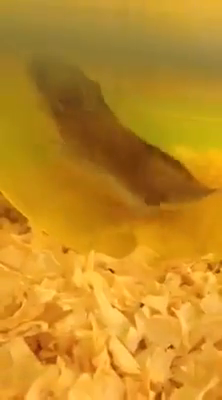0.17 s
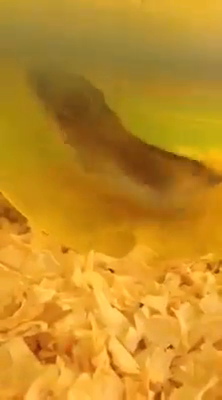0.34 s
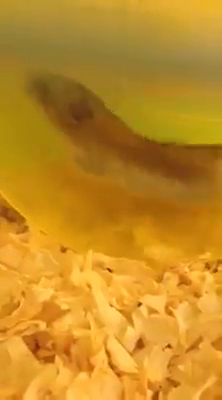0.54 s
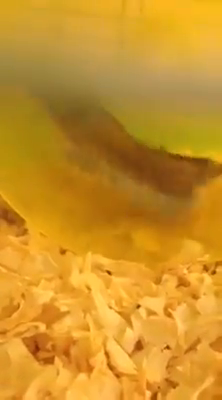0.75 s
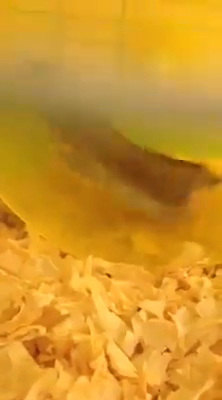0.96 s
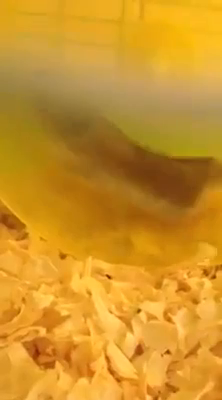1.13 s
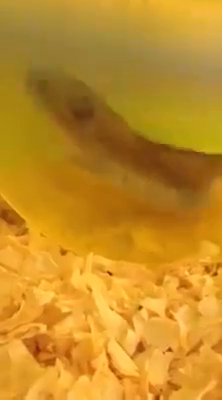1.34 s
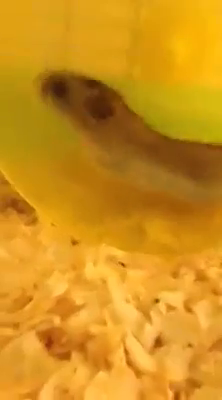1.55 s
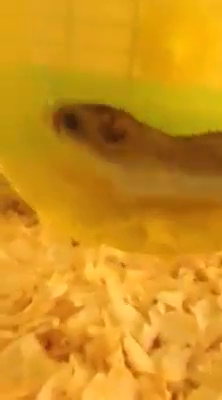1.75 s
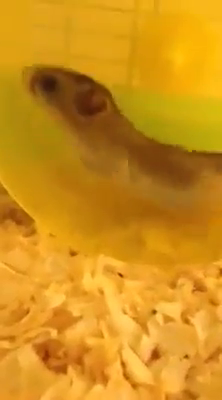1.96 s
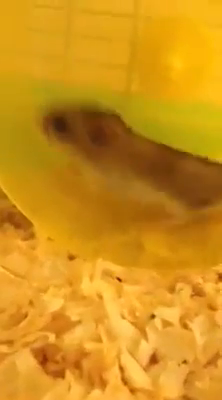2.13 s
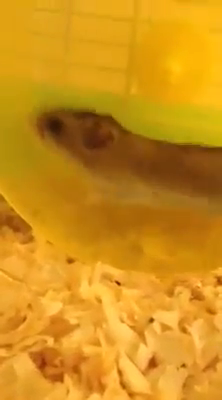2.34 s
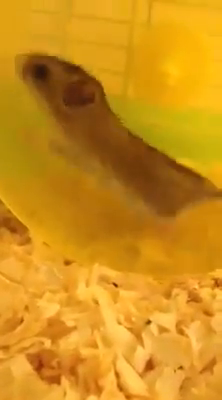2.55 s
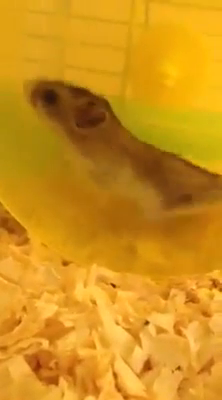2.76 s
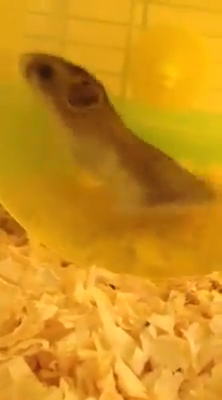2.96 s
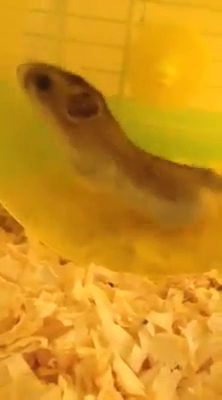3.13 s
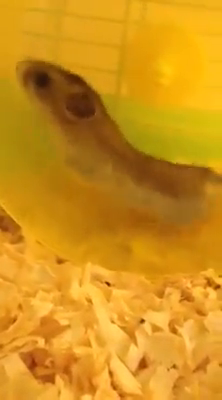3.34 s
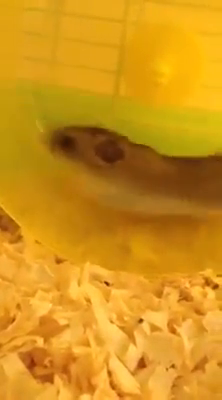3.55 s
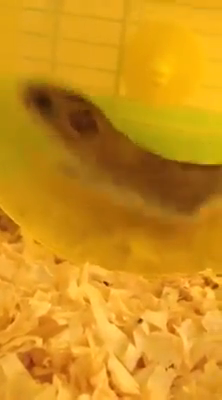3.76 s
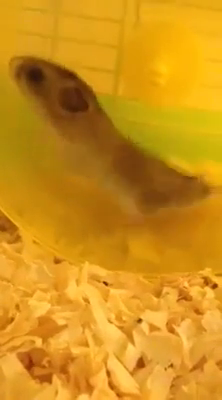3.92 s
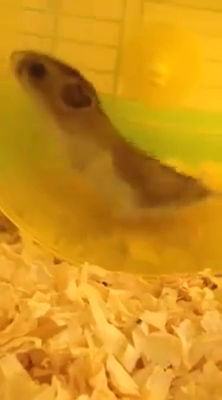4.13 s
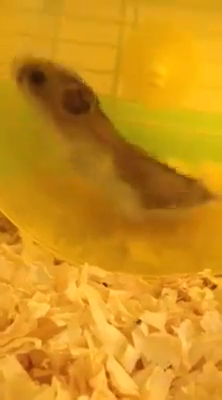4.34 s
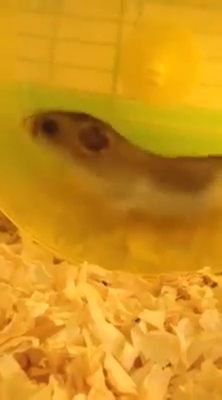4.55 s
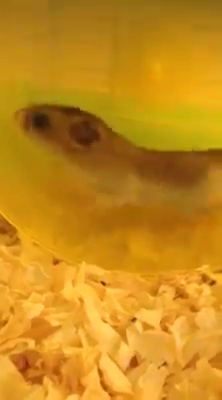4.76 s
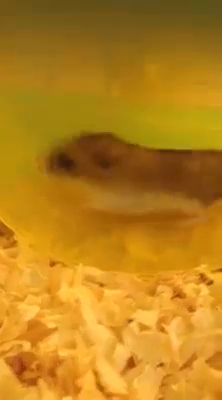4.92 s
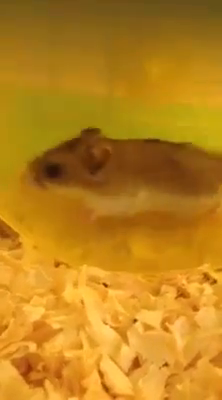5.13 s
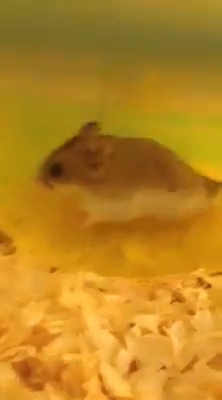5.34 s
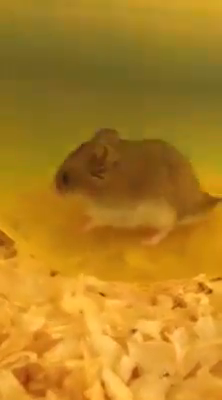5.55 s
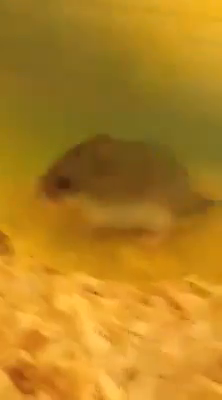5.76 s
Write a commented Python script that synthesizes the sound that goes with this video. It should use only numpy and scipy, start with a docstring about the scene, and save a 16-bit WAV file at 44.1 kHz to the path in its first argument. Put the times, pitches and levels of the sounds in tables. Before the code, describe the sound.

Rapid dull paw taps drum in bursts on a thin plastic wheel over faint grainy hiss, broken by sharp plastic clicks.

```python
"""Quick footfalls of a hamster running in bursts in a plastic wheel in a cage, close to the microphone.
Each paw rings the wheel's shell, taps it with claws and booms faintly in the cage's resonances.
Plastic parts snap a few times: a hard crack, a chatter and a jolt that knocks the wheel.
The turning wheel adds a grainy hiss, a low rumble and brief sizzles of shaped noise.
As the running stops, swelling strokes of friction noise brush and rustle nearby, over quiet room air."""
import sys
import numpy as np
from scipy import signal
from scipy.io import wavfile
from scipy.ndimage import uniform_filter1d

SR = 44100
rng = np.random.default_rng(int(sys.argv[2]) if len(sys.argv) > 2 else 0)


def to_wav(s):
    """Save 16-bit WAV."""
    ch = np.atleast_2d(s).T  # columns
    pcm = np.round(np.clip(ch, -1, 1) * 32767)  # PCM
    wavfile.write(sys.argv[1], SR, pcm.astype(np.int16))


N = 259749
TIME = np.arange(N) / SR  # seconds

# Footfalls, levels relative within each column:
# start_s, force_db (on the wheel), claw_db (tap), thump_db (passed to the cage)
FOOTFALLS = [(0.059, -49.5, -70, -67.5), (0.105, -43, -63, -67), (0.186, -42.5, -66.5, -67.5),
             (0.25, -44.5, -63, -77), (0.372, -51.5, -65, -68.5), (0.559, -40, -71, -70),
             (0.681, -36.5, -56, -62), (0.795, -37.5, -65.5, -57.5), (0.886, -41, -54, -52.5),
             (0.955, -47, -53.5, -54.5), (1.039, -39, -63, -57.5), (1.105, -35, -55, -60.5),
             (1.171, -31, -48.5, -53), (1.271, -35, -48.5, -53), (1.3, -33.5, -54.5, -66),
             (1.413, -54, -60.5, -60.5), (1.469, -32.5, -57.5, -62), (1.596, -42, -53.5, -51.5),
             (1.672, -35, -65, -57), (1.867, -37.5, -52.5, -55), (1.93, -39, -79, -59),
             (2.015, -39, -54.5, -56.5), (2.13, -41.5, -66, -65), (2.225, -39, -69, -68),
             (2.455, -44, -79, -59.5), (2.615, -52, -77, -65.5), (2.708, -48, -68, -66.5),
             (2.965, -52, -69, -64), (3.007, -40, -67, -63.5), (3.116, -39.5, -77, -65.5),
             (3.247, -39, -67, -59), (3.456, -41, -65, -66), (3.56, -37.5, -57.5, -61),
             (3.634, -46, -81, -69.5), (3.753, -35.5, -57.5, -57), (3.798, -38, -58.5, -54),
             (3.876, -38, -65, -56.5), (3.954, -40, -59, -60.5), (3.992, -36.5, -59, -60),
             (4.061, -33.5, -56, -58), (4.163, -46, -57.5, -53.5), (4.218, -52, -65.5, -62),
             (4.306, -35, -54, -55.5), (4.395, -34.5, -53, -58), (4.487, -35, -59, -63.5),
             (4.614, -44.5, -75, -60), (4.671, -36.5, -61, -67), (4.741, -40.5, -64, -69),
             (4.862, -43, -57, -57.5), (4.894, -48, -54.5, -54), (4.959, -39, -68, -60),
             (5.035, -38, -57, -67), (5.129, -45.5, -76, -69.5)]
# Snaps of plastic, levels relative within each column: start_s, crack_db, flex_db (of the wall),
# jolt_db (given to wheel and cage), top_hz (treble limit set by the contact's hardness)
PLASTIC_SNAPS = [(1.547, -8.5, -10.5, -32, 15000), (1.5570, -38, -28, -44, 5000),
                 (1.5728, -21.5, -36, -48, 8850), (1.7670, -46, -40, -45.5, 2000),
                 (1.7740, -20, -44, -47.5, 14100), (1.7827, -38, -28, -43.5, 12000),
                 (1.799, -28.5, -48, -47, 13100), (2.525, -44, -59, -72, 12000),
                 (5.638, -43, -43, -63, 4000), (5.8359, -12, -18.5, -52, 11000)]


def amp(db):
    """Decibels to gain."""
    return 10 ** (np.asarray(db) / 20)


def evened(x):
    """Scales to unit power."""
    return x / np.sqrt(np.mean(x ** 2) + 1e-20)


def add(mix, start_s, sound):
    """Adds a sound to the mix, in place, from start_s seconds."""
    part = mix[max(round(start_s * SR), 0):][:len(sound)]
    part += sound[:len(part)]


def response(points, size=4096):
    """Causal minimum-phase impulse response with the spectrum drawn through (Hz, dB) points."""
    hz, db = np.transpose(points)
    f = abs(np.fft.fftfreq(size, 1 / SR))
    log_gain = np.log(amp(np.interp(np.log(f + 1), np.log(hz), db)))
    spectrum = np.exp(np.conj(signal.hilbert(log_gain)))
    return np.fft.ifft(spectrum).real[:size // 2]


def colour(x, points):
    """Filters by a spectrum, to unit power."""
    return evened(signal.fftconvolve(x, response(points))[:len(x)])


def grains(count, spread_db):
    """Friction noise made of tiny contacts of uneven strength."""
    strength = evened(uniform_filter1d(rng.standard_normal(count), size=40))
    return rng.standard_normal(count) * amp(spread_db * strength)


def peak(x, hz, width_hz):
    """A fixed resonance of gain 1."""
    return signal.lfilter(*signal.iirpeak(hz, hz / width_hz, fs=SR), x)


def resonate(x, hz, width_hz):
    """A moving resonance of gain 1: shifts its centre to zero, smooths, and shifts back."""
    turn = np.exp(2j * np.pi * np.cumsum(hz * np.ones(len(x))) / SR)
    r = np.exp(-np.pi * width_hz / SR)
    smoothed = signal.lfilter([1 - r], [1, -r], x / turn)
    return 2 * (turn * smoothed).real


def swells(rows):
    """Gain of bell-shaped swells, each at half height at the ends of its length."""
    return sum(amp(db) * .5 ** ((2 * (TIME - s) / length) ** 2) for s, length, db in rows)


def footfalls(knock_db=-5.5, claws_db=-1.5, boom_db=3, boom_t60=0.29, boom_rise=0.0054, claw_lag_s=0.001196):
    """Each paw knocks the shell and taps it with its claws; the cage's boom swells a moment later."""
    out, t = np.zeros(N), np.arange(SR // 5) / SR
    for start_s, force_db, claw_db, thump_db in FOOTFALLS:
        shake = rng.standard_normal(len(t)) * amp(-60 * t / boom_t60) * np.tanh(t / boom_rise)
        boom = cage(shake)
        boom /= np.std(boom[:SR // 20])
        add(out, start_s, amp(force_db + knock_db) * knock(t))
        add(out, start_s, amp(thump_db + boom_db) * boom)
        # the claws touch just after the pad
        add(out, start_s + claw_lag_s, amp(claw_db + claws_db) * claws(t))
    # the small wheel radiates no deep bass
    return signal.sosfilt(signal.butter(4, 80, "high", fs=SR, output="sos"), out)


def knock(t, detune=0.019, uneven_db=1.4):
    """The shell rings; every paw lands on another spot, which shifts and weights the modes anew."""
    # Modes of the wheel's shell; low bending waves arrive later and swell slowly:
    # pitch_hz (before detuning), level_db (relative), t60_s, lag_s, rise_cycles
    shell_modes = [(126.8, -20, 0.28, 0, 2), (185, -10, 0.18, 0.017, 2.1), (267, -10, 0.12, 0.0048, 0.23),
                   (333.7, 2, 0.091, .005, 2.43), (416, -4.5, 0.024, 0.00032, 0.54),
                   (487.2, -1.5, 0.094, 0.00014, 1.08), (624, -11.5, 0.024, 0.00028, 0.42),
                   (646, -36, 0.018, 0.035, 0.23)]
    hz, db, t60, lag, rise = np.transpose(shell_modes)[:, :, None]
    pitch, weight = rng.standard_normal((2, len(shell_modes), 1))
    age = np.maximum(t - lag, 0)
    cycles = hz * (1 + detune * pitch) * age
    envelope = np.tanh(cycles / rise) * amp(db + uneven_db * weight - 60 * age / t60)
    return np.sum(envelope * np.sin(2 * np.pi * cycles), 0)


def claws(t, scrape_db=-26, scrape_t60=.06, uneven_db=2, tap_db=14):
    """A crisp tap; an impulse and a short scrape ring the plastic's higher resonances."""
    # Higher resonances of the plastic: centre_hz, width_hz, level_db (relative)
    claw_modes = [(567, 123, 12.5), (707, 21, 7), (892, 17, -1), (1043, 32, 12.5), (1075, 80, 4),
                  (1410, 22, 0.5), (1587, 13, 3), (1670, 120, 3), (1883, 60, 5), (2040, 37, -12),
                  (2430, 490, -38)]
    # Colour of a paw's first contact: pitch_hz, level_db (relative)
    tap_colour = [(100, -15.5), (300, 10), (600, -14.5), (1100, -8.5), (2100, -4.5), (2600, -12),
                  (5000, -40), (15000, -26)]
    paw_top_hz = 2240  # a paw is too soft to excite the plastic above this
    drive = grains(len(t), spread_db=9.5) * amp(scrape_db - 60 * t / scrape_t60)
    drive[0] += 1
    signs = (-1) ** np.arange(len(claw_modes))
    weights = amp(uneven_db * rng.standard_normal(len(claw_modes))) * signs
    ring = sum(w * amp(db) * peak(drive, hz, width) for w, (hz, width, db) in zip(weights, claw_modes))
    ring /= np.std(ring[:SR // 50])
    tap = response(tap_colour)
    add(ring, 0, amp(tap_db) * tap / abs(tap).max())
    return signal.sosfilt(signal.butter(6, paw_top_hz, fs=SR, output="sos"), ring)


def cage(x, low_hz=85, top_hz=720):
    """The cage's box resonances, which pass only the low middle range."""
    # Resonances of the cage: centre_hz, width_hz, level_db (relative)
    box_modes = [(114, 7.7, -15), (121.7, 9.2, 2), (189.7, 40, 4), (228.6, 8.2, 0.5), (271.7, 29, 3.5),
                 (318.6, 38, 3), (404, 42, 1), (469, 29, 0.5), (583, 32, -11.5), (612, 11, -8)]
    ring = sum(amp(db) * peak(x, hz, width) for hz, width, db in box_modes)
    return signal.sosfilt(signal.butter(3, [low_hz, top_hz], "band", fs=SR, output="sos"), ring)


def snaps(crack_db=-1, burst_db=-18, burst_t60=0.011, flex_hz=1400, chatter_db=-31, chatter_t60=0.043,
          jolt_t60=0.18, dull_db=-4):
    """A hard, gritty crack as the wall flexes, a brief chatter, and a dull jolt that rocks the wheel."""
    # Colour of a snap: pitch_hz, level_db (relative)
    snap_colour = [(60, -79), (250, 9), (600, -6.5), (1500, 5), (2700, 4.5), (3400, -2.5), (4400, -12),
                   (6300, -6.5), (8200, -15), (10000, -8), (15000, -16)]
    # Colour of the dull jolt that comes with it: pitch_hz, level_db (relative)
    jolt_colour = [(25, -13), (70, -25), (130, -2), (300, -5), (520, 1), (800, -10.5), (1300, -13.5),
                   (2200, -33), (5000, -32), (15000, -58)]
    # the wall's flex dies within a cycle and radiates little bass
    flex_radians, flex_low_hz = 2.1, 117
    # the jolted wheel rocks and knocks back on its axle
    rock_s, rock_db = .016, 2.5
    out, t = np.zeros(N), np.arange(SR // 7) / SR
    pulse = response(snap_colour)
    phase = 2 * np.pi * flex_hz * t
    flex = np.sin(phase) * np.exp(-phase / flex_radians)
    flex = signal.lfilter(*signal.butter(2, flex_low_hz, "high", fs=SR), flex)
    dying = amp(burst_db - 60 * t / burst_t60) + amp(chatter_db - 60 * t / chatter_t60)
    for start_s, db, flex_db, jolt_db, top_hz in PLASTIC_SNAPS:
        crack = dying * colour(rng.standard_normal(len(t)), snap_colour)
        add(crack, 0, amp(crack_db) * pulse / abs(pulse).max())
        add(out, start_s, amp(db) * signal.lfilter(*signal.butter(2, top_hz, fs=SR), crack))
        add(out, start_s, amp(flex_db) * flex)
        jolt = colour(rng.standard_normal(len(t)), jolt_colour)
        add(out, start_s, jolt * amp(jolt_db + dull_db - 60 * t / jolt_t60))
        add(out, start_s + rock_s, amp(jolt_db + rock_db) * knock(t))
    return out


def rolling(slow_db=-69.0, spin_db=2.0, grain_db=2.0, wobble_db=1.23):
    """The wheel slides round its axle: a grainy, wobbling hiss and a low rumble in the cage."""
    # Spells of faster turning, in which the hiss swells: middle_s, length_s, level_db (before spin_db)
    spins = [(.55, .85, -69), (1.48, 1, -67.5), (3.25, 0.73, -67), (4.5, 0.88, -66.5)]
    # Colour of the hiss: pitch_hz, level_db (relative)
    hiss_colour = [(410, -31), (700, -10), (871, -1), (1030, 3), (1180, -2), (1310, -1), (1490, -2.5),
                   (1880, -1.5), (2280, -6.5), (4160, -6), (5450, -11), (6110, -7.5), (8530, -11.5),
                   (14300, -10), (15000, -14)]
    # from here on, as the running ends, the wheel coasts and its hiss fades
    coast_s, coast_db_per_s = 4.67, 3
    rumble_db, rumble_idle_db = -26.5, -67.5
    wobble = wobble_db * evened(uniform_filter1d(rng.standard_normal(N), size=1500))
    coasting = amp(-coast_db_per_s * np.maximum(TIME - coast_s, 0))
    sliding = coasting * np.hypot(amp(slow_db), amp(spin_db) * swells(spins))
    hiss = colour(grains(N, spread_db=grain_db), hiss_colour) * sliding * amp(wobble)
    rumble_gain = np.hypot(amp(rumble_idle_db), amp(rumble_db) * shaking())
    rumble = evened(cage(rng.standard_normal(N))) * rumble_gain
    return hiss + rumble


def shaking(fade_s=0.12):
    """How hard the cage shakes: it stores the energy of every footfall and jolt, which leaks away."""
    energy = np.zeros(N)
    for start_s, force_db, _, _ in FOOTFALLS:
        add(energy, start_s, amp([force_db]) ** 2)
    for start_s, _, _, jolt_db, _ in PLASTIC_SNAPS:
        add(energy, start_s, amp([jolt_db]) ** 2)
    return np.sqrt(signal.lfilter([1], [1, -np.exp(-1 / (fade_s * SR))], energy))


def brushing(width_hz=1400, low_hz=450, top_hz=3400):
    """Friction grains that swell and brighten through each stroke, then die away."""
    # Soft brushing strokes, then a rustle: peak_s, rise_s, rub_db, centre_hz (at the peak), fizz_db
    strokes = [(5.34, .08, -64.5, 890, -91), (5.45, 0.072, -63, 1480, -70.5),
               (5.764, 0.071, -61, 1350, -55.5), (5.873, 0.049, -46.5, 1980, -55)]
    # Colour of the rustle's fizz: pitch_hz, level_db (relative)
    fizz_colour = [(800, -39), (2800, -2), (4100, -3.5), (5500, -2.5), (8500, -3), (11000, -12.5),
                   (15000, -6.5)]
    # a stroke dies quickly, and the pitch of its rub rises as it goes
    fall_s, octaves_per_s = 0.053, 6.7
    out, t = np.zeros(N), np.arange(-SR // 3, SR // 5) / SR  # t is 0 at the stroke's peak
    band = signal.butter(4, [low_hz, top_hz], "band", fs=SR, output="sos")
    for peak_s, rise_s, rub_db, hz, fizz_db in strokes:
        pressure = np.exp(np.minimum(t / rise_s, -t / fall_s))
        rub = resonate(grains(len(t), spread_db=3.0), hz * 2 ** (octaves_per_s * t), width_hz)
        rub = evened(signal.sosfilt(band, rub))
        fizz = colour(grains(len(t), spread_db=2.0), fizz_colour)
        add(out, peak_s + t[0], pressure * (amp(rub_db) * rub + amp(fizz_db) * fizz))
    return out


def sizzle(low_hz=12500):
    """A faint, very high sizzle of noise that comes and goes."""
    # Brief swells of thin sizzle high above the hiss: middle_s, length_s, level_db
    sizzle_swells = [(.83, .07, -63), (1.04, 0.19, -62.5)]
    fine = signal.sosfilt(signal.butter(8, low_hz, "high", fs=SR, output="sos"), rng.standard_normal(N))
    return evened(fine) * swells(sizzle_swells)


def room_air(level_db=-69):
    """Still air of the room: steady noise, strongest in the bass."""
    # Colour of the air: pitch_hz, level_db (relative)
    air_colour = [(20, -43), (50, -26), (75, -38), (110, 15), (250, 1.5), (500, -18.5), (900, -15),
                  (2000, -8), (6000, -12.5), (15000, -20)]
    return amp(level_db) * colour(rng.standard_normal(N), air_colour)


def scene():
    """All sources over the room's quiet air, on one channel."""
    return (footfalls() + snaps() + rolling() + brushing() + sizzle() + room_air())[None]


def record(dry):
    """The microphone's weak deep bass and the recorder's band limit."""
    bass_hz, edge_hz = 35, 15050
    dry = signal.lfilter(*signal.butter(1, bass_hz, "high", fs=SR), dry)
    band_limit = signal.firwin(511, edge_hz, window=("kaiser", 9), fs=SR)
    return signal.oaconvolve(dry, band_limit[None], "same")


dry = scene()
out = record(dry)
to_wav(out)
```